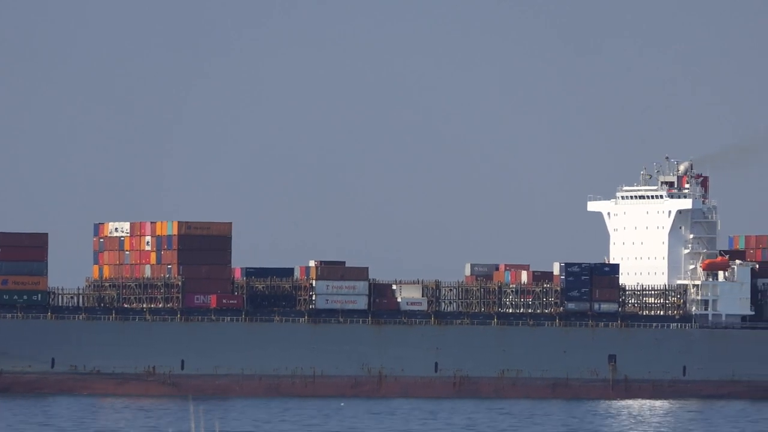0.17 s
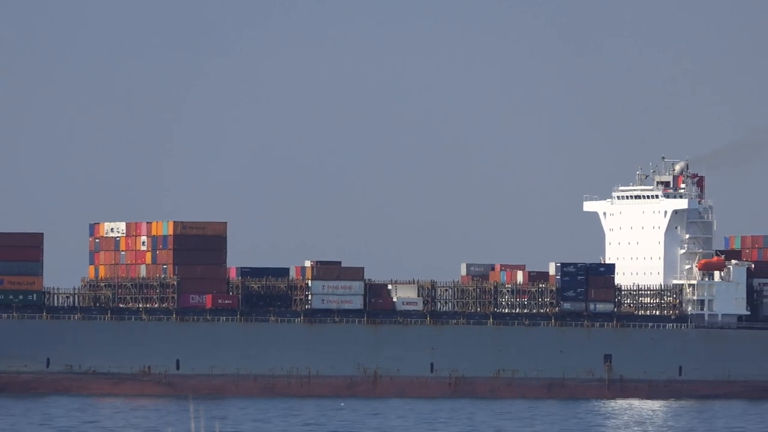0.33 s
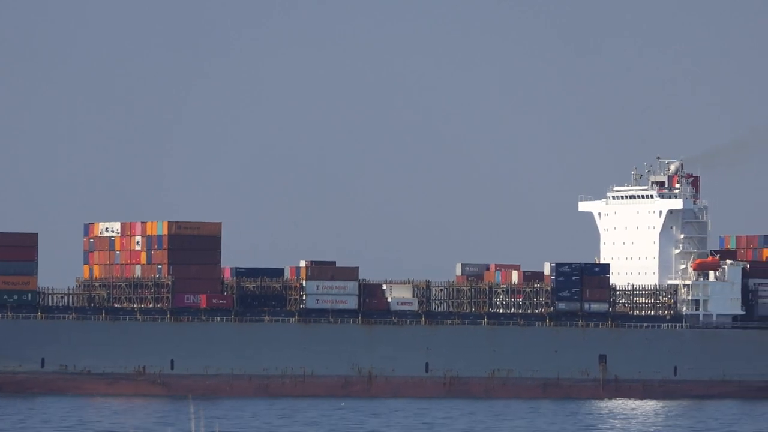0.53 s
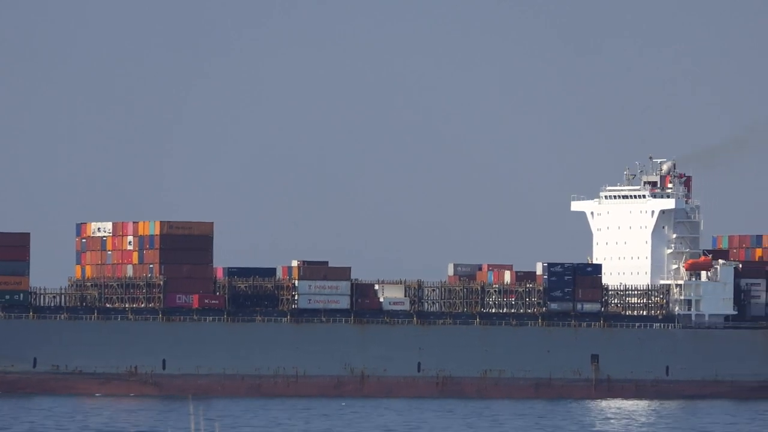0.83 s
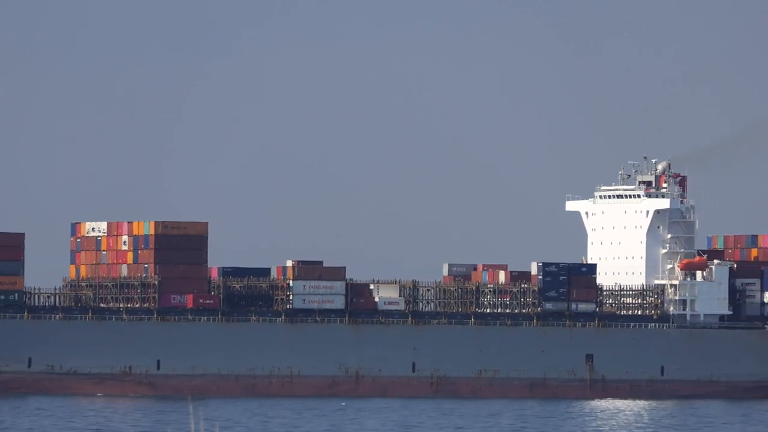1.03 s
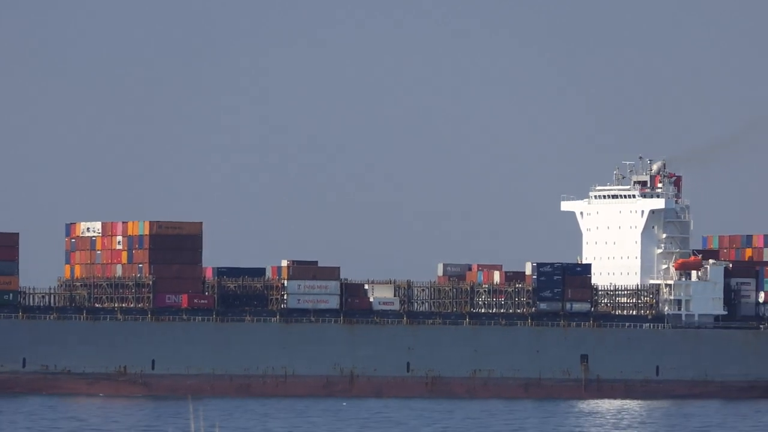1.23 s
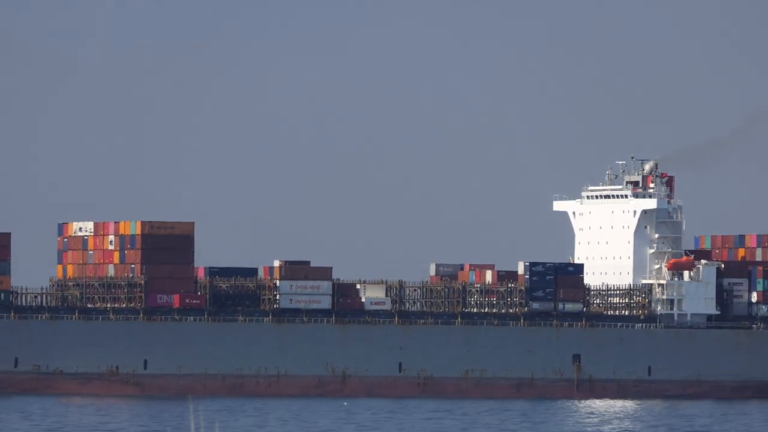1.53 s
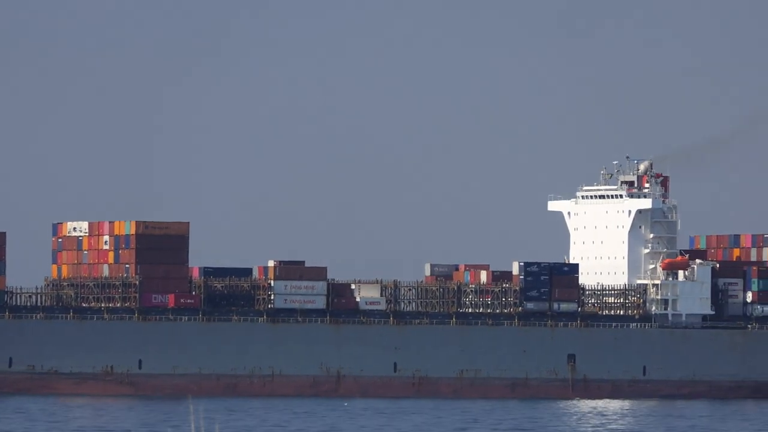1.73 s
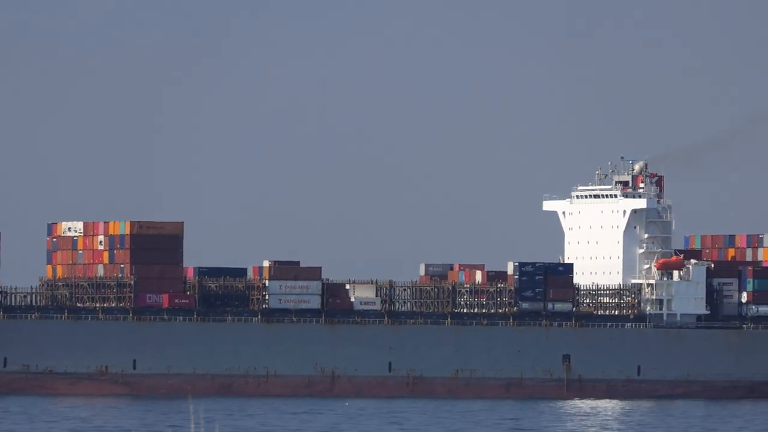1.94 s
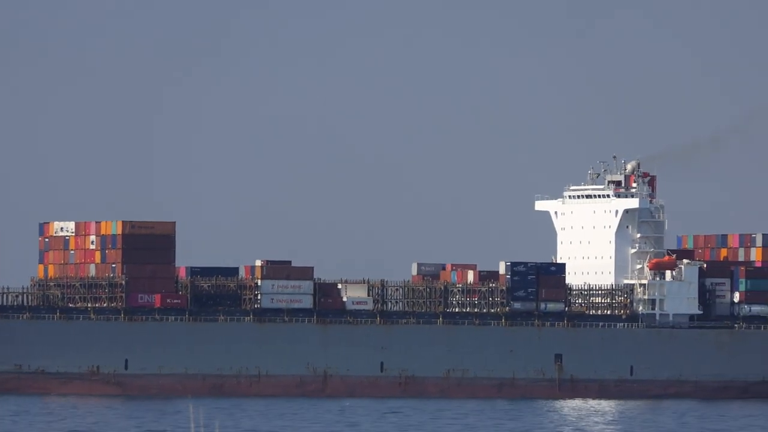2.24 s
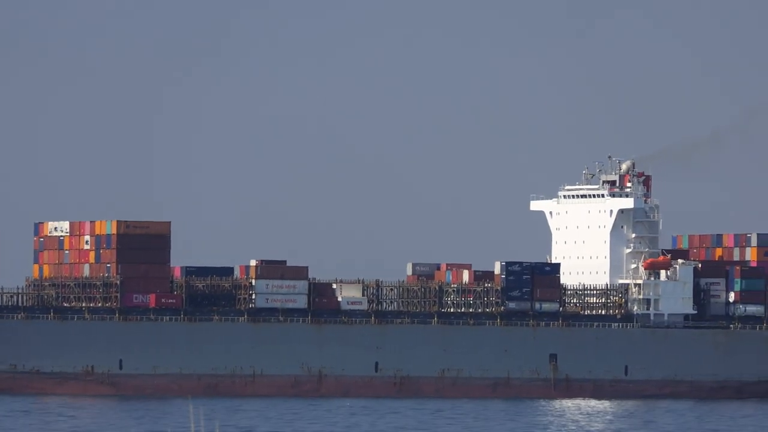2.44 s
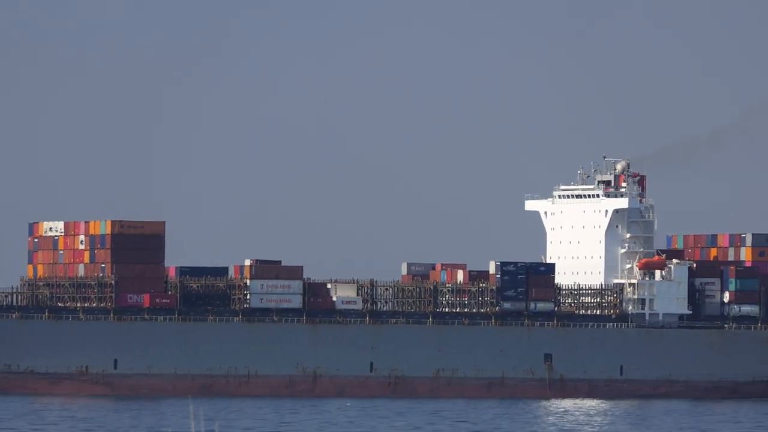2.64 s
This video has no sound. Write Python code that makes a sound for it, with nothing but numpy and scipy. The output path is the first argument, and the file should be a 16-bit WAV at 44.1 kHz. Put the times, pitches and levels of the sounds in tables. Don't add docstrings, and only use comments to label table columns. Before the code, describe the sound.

A large ship's engine hums far across open water, a mid-low throbbing tone wavering in strength over soft rumble; faint ticks and a brief rustle near the microphone just after one second, then light wind bumps.

```python
import sys
import numpy as np
from scipy import signal
from scipy.io import wavfile
from scipy.ndimage import uniform_filter1d

SR = 44100
rng = np.random.default_rng(int(sys.argv[2]) if len(sys.argv) > 2 else 0)


def ratio_of_db(decibels):
    return 10 ** (np.asarray(decibels, float) / 20)


def unload_audio(sound):
    columns = np.transpose(np.atleast_2d(sound))
    steps = np.round(np.clip(columns, -1, 1) * 32767)
    wavfile.write(sys.argv[1], SR, steps.astype(np.int16))


N = 123479
TIME_S = np.arange(N) / SR


def rms_one(x):
    return x / np.sqrt(np.mean(x ** 2) + 1e-20)


def at_hz(points, hz):
    pitches, values = np.transpose(points)
    return np.interp(np.log(hz), np.log(pitches), values)


def drift(rate_hz):
    every = 40
    r = np.exp(-2 * np.pi * rate_hz * every / SR)
    chance = rng.standard_normal(N // every + 2002)
    slow = signal.lfilter([1], [1, -2 * r, r * r], chance)[2000:]
    return np.interp(np.arange(N) / every, np.arange(len(slow)), rms_one(slow - slow.mean()))


def resonate(x, hz, width_hz):
    r = np.exp(-np.pi * width_hz / SR)
    top = np.array([1, 0, -1]) * (1 - r * r) / 2
    return signal.lfilter(top, [1, -2 * r * np.cos(2 * np.pi * hz / SR), r * r], x)


def lean(left_minus_right_db):
    return ratio_of_db(left_minus_right_db / 2 * np.array([[1], [-1]]))


def pair(mid, side, alike, lean_db):
    shared = np.sqrt(1 + alike) * mid
    opposed = np.sqrt(1 - alike) * side * [[1], [-1]]
    return (shared + opposed) * lean(lean_db)


def funnel():
    # start_s, level_db
    effort = [(0.0, -38), (0.23, -42), (0.58, -37.5), (0.83, -46), (0.86, -35.5), (1.39, -42.5),
              (1.51, -35), (1.67, -50), (1.71, -33.5), (1.89, -45), (1.99, -33.5), (2.03, -41.5),
              (2.36, -36), (2.43, -45), (2.48, -33.5), (2.73, -47.5), (2.77, -39), (2.8, -37.5)]
    # pitch_hz, width_hz, level_db, left_minus_right_db
    hum_pipes = [(345, 13, -1.0, 3.5), (355, 20, -2.5, 1.7)]
    # pitch_hz, width_hz, level_db, left_minus_right_db
    other_pipes = [(232, 13, -20.5, 1.5), (255, 30, -27, 1.5), (277, 20, -16.5, 2.4), (312, 28, -10, 2.6),
                   (380, 24, -15, 1.2), (444, 26, -29, 1.5), (546, 24, -36, 3.0)]
    throb_hz, throb_db, flutter_db = 8, -1, -0.24
    evenness = 0.83
    lag_s = 0.00003

    roar = rng.standard_normal((2, 2, N + SR))
    hum = pipes(roar[0], hum_pipes)[:, SR:]
    rest = pipes(roar[1], other_pipes)[:, SR:]
    size = np.sqrt(np.mean(hum ** 2))
    power = uniform_filter1d(uniform_filter1d(hum[0] ** 2, size=2000), size=2000)
    swell = np.sqrt(power) + 1e-9

    effort_db = uniform_filter1d(np.interp(TIME_S, *np.transpose(effort)), size=1500)
    usual_db = effort_db.mean()
    throb = throb_db * np.sin(2 * np.pi * throb_hz * TIME_S + 0.37) + flutter_db * drift(2.1)
    hum = rms_one(hum / swell ** evenness) * ratio_of_db(effort_db + throb)
    rest = rest / size * ratio_of_db(usual_db + 0.11 * (effort_db - usual_db))

    both = (hum + rest) * ratio_of_db(16.5)
    left, right = both - resonate(both, 414, 45)
    return np.array([left, np.interp(np.arange(N) - lag_s * SR, np.arange(N), right)])


def pipes(roar, rows):
    out = 0
    for k, (hz, width_hz, db, lean_db) in enumerate(rows):
        ring = resonate(resonate(roar[k % 2], hz, width_hz), hz, width_hz)
        out = out + ratio_of_db(db) * lean(lean_db) * ring
    return out * [[1], [-1]]


def drone():
    hull = resonate(rng.standard_normal(N + SR), 59, 7.4)[SR:]
    return ratio_of_db(-51) * rms_one(hull)


def ticks():
    # start_s, peak_db, pitch_hz, left_minus_right_db
    tick_list = [
        (1.222, -50, 6500, 17),
        (1.228, -37.5, 1100, 13),
        (1.227, -50, 2400, 5),
        (1.257, -43.5, 5200, 8),
        (1.291, -54, 3100, 4),
        (1.296, -43.5, 3430, 11),
        (1.295, -45, 1450, 12),
        (2.059, -44, 1100, 5),
        (.73, -50, 4200, 4),
        (.873, -50, 2800, 0),
    ]
    ring_cycles = 7
    scuff_s, scuff_db = 0.0035, -11
    out, t = np.zeros((2, N + 2000)), np.arange(1000) / SR
    for start_s, db, hz, lean_db in tick_list:
        ring = np.sin(2 * np.pi * hz * t) * ratio_of_db(-60 * t * hz / ring_cycles)
        scuff = rms_one(resonate(rng.standard_normal(1000), hz, hz * 0.55))
        scuff = scuff * np.exp(-t / scuff_s) * ratio_of_db(scuff_db)
        first = int(start_s * SR)
        out[:, first:first + 1000] += (ring + scuff) * ratio_of_db(db) * lean(lean_db)
    return out[:, :N]


def rustle():
    from_s, to_s, clicks_per_s = 1.215, 1.32, 900
    born = rng.random(N) < clicks_per_s / SR
    strength = ratio_of_db(3.8 * np.minimum(rng.exponential(1, N), 3))
    grains = born * strength * rng.choice([-1, 1], N)
    stroke = (TIME_S > from_s) & (TIME_S < to_s)
    return resonate(grains * stroke + 1e-18, 2200, 3000) * ratio_of_db(-47 + np.array([[2.2], [-2.8]]))


def puffs():
    # start_s, length_s, peak_db
    push_list = [
        (1.745, .065, -33),
        (2.19, .05, -32),
        (2.395, .058, -26),
        (.98, .06, -39),
    ]
    cut = signal.butter(2, [3, 28.4], "band", fs=SR, output="sos")
    mid, side = signal.sosfilt(cut, rng.standard_normal((2, N + SR)))[:, SR:]
    lumps = rms_one(pair(mid, side, 0.54, 2.5)) * ratio_of_db(-45)
    push = np.zeros(N)
    for start_s, length_s, db in push_list:
        progress = np.clip((TIME_S - start_s) / length_s, 0, 1)
        push += ratio_of_db(db) * np.sin(np.pi * progress) ** 1.4
    push = signal.sosfilt(signal.butter(1, 2.5, "high", fs=SR, output="sos"), push)
    return lumps + push * ratio_of_db(np.array([[2.5], [-3.5]]))


def wash():
    # pitch_hz, level_db (per Hz)
    wash_levels = [(30, -4), (90, -6), (170, -13), (500, -15.5), (900, -34), (1700, -43.5), (5000, -50),
                   (15000, -51.5)]
    # pitch_hz, likeness (-1 to 1)
    wash_likeness = [(60, 0.74), (110, 0.58), (170, -0.42), (400, -0.13), (740, -0.12), (1500, -0.74),
                     (3500, -0.26), (15000, -0.14)]
    # pitch_hz, left_minus_right_db
    wash_lean = [(60, 0), (150, 4), (740, 0.9), (2500, 3.5), (15000, 1.5)]
    patchy_db = 1.15
    swell_start_s, swell_length_s, swell_db = 1.72, 0.021, 3.5

    out, together = 0, drift(6)
    edges = 24 * 2 ** np.arange(0, 9.7, 0.4)
    swell = swell_db * np.exp(-((TIME_S - swell_start_s) / swell_length_s) ** 2)
    white = rng.standard_normal((2, 2, N + 8000))
    for k, (low, high) in enumerate(zip(edges, edges[1:])):
        band = signal.butter(2, [low, high], "band", fs=SR, output="sos")
        mid, side = signal.sosfilt(band, white[k % 2])[:, -N:]
        hz = np.sqrt(low * high)
        flicker = patchy_db * (0.58 * together + drift(19)) / (1 + hz / 4800)
        gain = ratio_of_db(at_hz(wash_levels, hz) + flicker + swell * (hz < 1200))
        out = out + gain * pair(mid, side, at_hz(wash_likeness, hz), at_hz(wash_lean, hz))
    return ratio_of_db(-39) * rms_one(out)


def scene():
    dull = signal.butter(2, 7000, fs=SR, output="sos")
    near = signal.sosfilt(dull, ticks() + rustle()) * ratio_of_db(-2.5)
    return funnel() + drone() + near + puffs() + wash()


def low_pass(x):
    return signal.sosfilt(signal.butter(12, 15720, fs=SR, output="sos"), x)


def record(dry):
    return low_pass(dry)


dry = scene()
out = record(dry)
unload_audio(out)
```